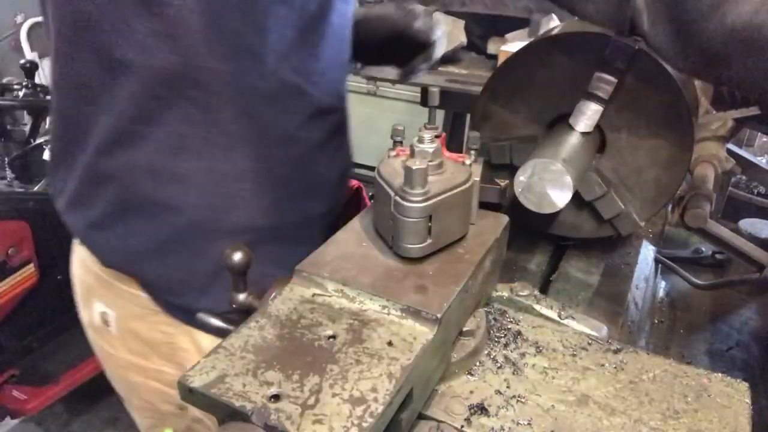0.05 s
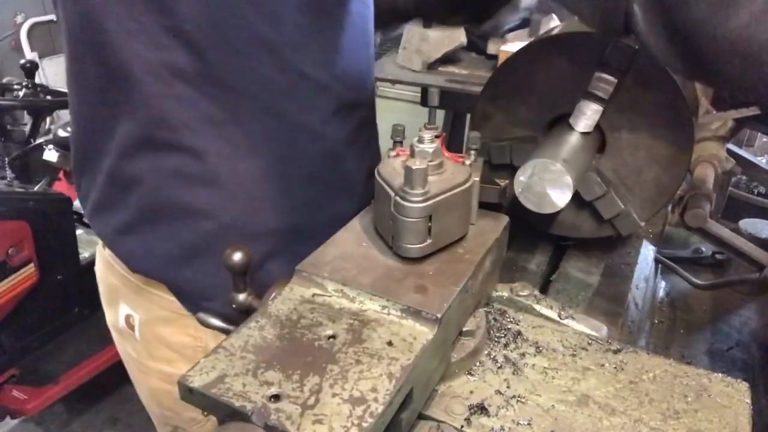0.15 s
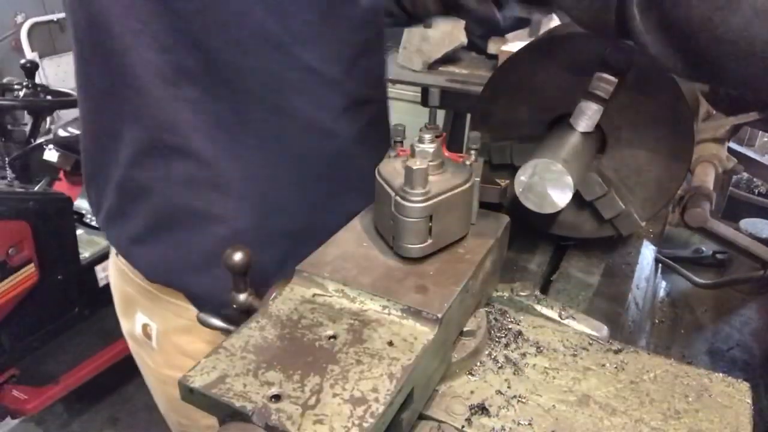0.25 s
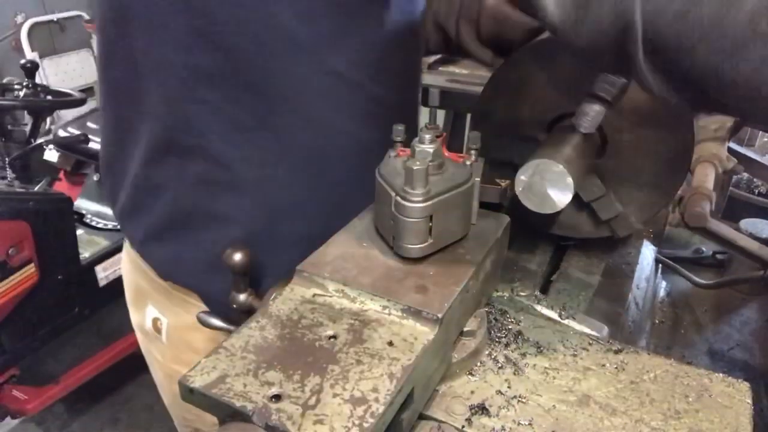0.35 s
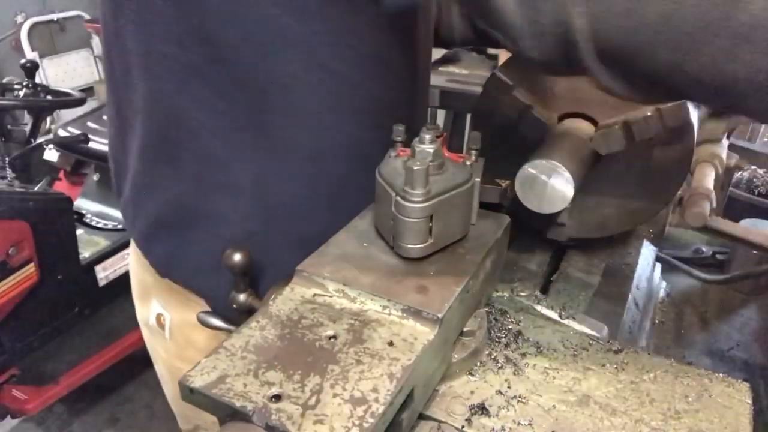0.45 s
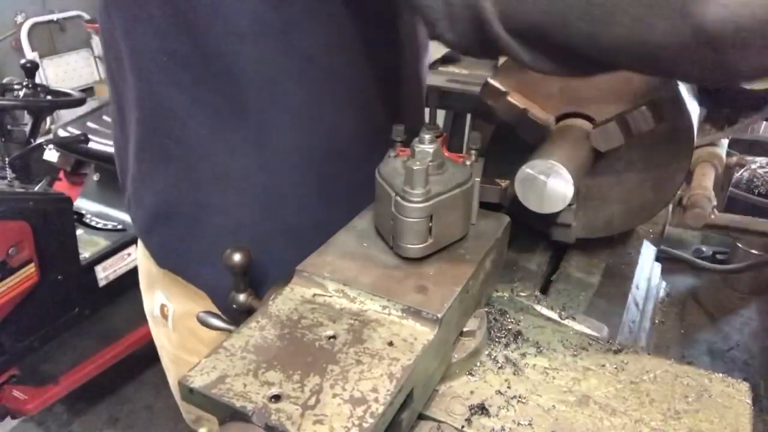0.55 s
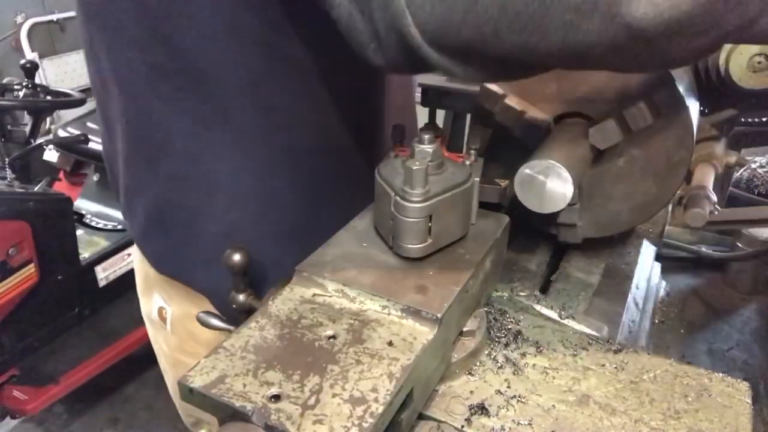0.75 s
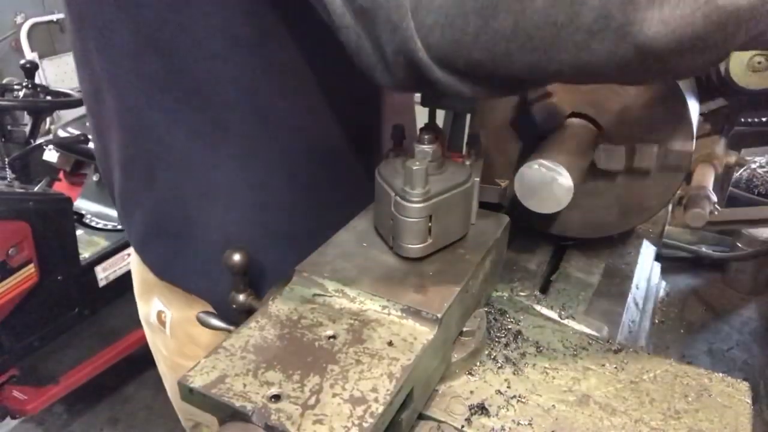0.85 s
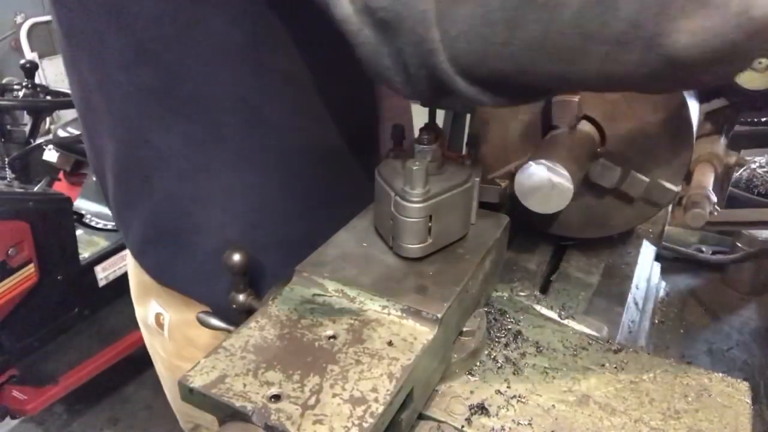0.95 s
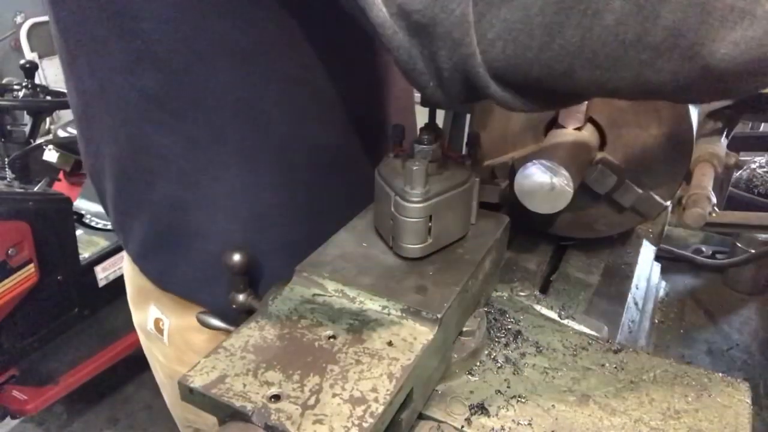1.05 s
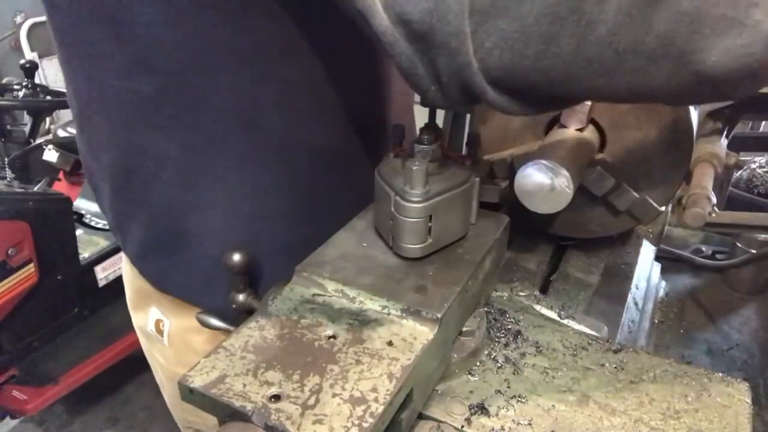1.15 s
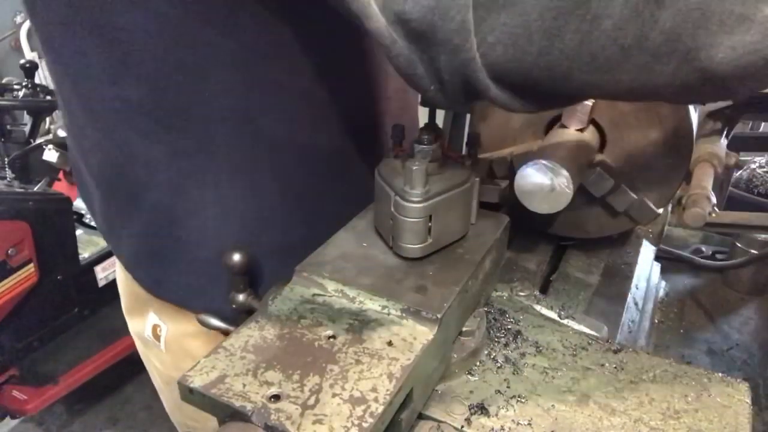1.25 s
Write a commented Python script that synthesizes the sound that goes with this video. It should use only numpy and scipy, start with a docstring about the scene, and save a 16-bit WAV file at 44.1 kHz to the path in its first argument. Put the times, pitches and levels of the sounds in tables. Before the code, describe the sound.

A steel lathe chuck is turned by hand, close up. A glove rustles faintly and the chuck scrapes and rumbles through the first 0.3 seconds. Two sharp, briefly ringing clacks land at about 0.4 and 0.47 seconds, the second with a low boom. A softer pair of knocks comes near 0.85 seconds, then small ticks and taps until 1.3 seconds, over low, steady workshop noise.

```python
"""A lathe chuck, turned by hand close to the microphone in a quiet workshop.
Its loose steel parts clack twice, each blow a crack of contact and a short, gritty ring; the second,
against the stop, makes the lathe's body boom. A softer pair of knocks and a few small ticks follow.
A glove rustles as it takes hold, and the chuck scrapes and rumbles in tiny slips as it is dragged round.
Behind it all are the workshop's short tail and low, steady room noise."""
import sys
import numpy as np
from scipy import signal
from scipy.fft import rfft, irfft
from scipy.io import wavfile
from scipy.ndimage import uniform_filter1d

SR = 44100
rng = np.random.default_rng(int(sys.argv[2]) if len(sys.argv) > 2 else 0)


def bounce(signal):
    """Save signal as a 16-bit WAV file at the path given by the first command-line argument."""
    frames = np.transpose(np.atleast_2d(signal))
    limited = np.clip(frames, -1, 1)
    pcm = np.round(limited * 32767).astype(np.int16)
    wavfile.write(sys.argv[1], SR, pcm)


N = 57330
T = np.arange(N) / SR


def amp(db):
    """Decibels to gain."""
    return 10 ** (np.asarray(db) / 20)


def unit(x):
    """Scales to rms 1."""
    return x / np.sqrt(np.mean(x ** 2) + 1e-20)


def burst(x):
    """Scales a short sound to the energy of 20 ms at rms 1."""
    return x * np.sqrt(.02 * SR / (np.sum(x ** 2) + 1e-20))


def fade(t60):
    """Exponential decay, 60 dB down after t60 seconds."""
    return np.exp(-np.log(1000) * T / t60)


def read(points, hz):
    """Reads (frequency, value) points on a log-frequency axis."""
    point_hz, value = np.transpose(points)
    return np.interp(np.log(hz + 1), np.log(point_hz + 1), value)


def colour(x, spectrum):
    """Filters x by a spectrum and scales it to rms 1."""
    gain = amp(read(spectrum, np.fft.rfftfreq(N, 1 / SR)))
    return unit(irfft(rfft(x) * gain, N))


def band(x, lo, hi, order=2):
    """Causal band-pass from lo to hi Hz."""
    sos = signal.butter(order, [lo, min(hi, SR / 2 - 100)], "band", fs=SR, output="sos")
    return signal.sosfilt(sos, x)


def add(mix, start, sound):
    """Mixes a sound in at start seconds, or at 0 if that is negative."""
    part = mix[max(round(start * SR), 0):]
    part += sound[:len(part)]


def ring(modes):
    """Dying sines of a struck object; neighbouring modes swing in opposite directions."""
    return sum((-1) ** k * amp(db) * fade(t60) * np.sin(2 * np.pi * hz * T)
               for k, (hz, db, t60) in enumerate(modes))


def hiss(spectrum, t60, even_hz=120):
    """A dying noise, evened out over spans of even_hz so that it keeps the given spectrum."""
    noise = rng.standard_normal(N) * fade(t60)
    bins = rfft(noise)
    local_power = uniform_filter1d(abs(bins) ** 2, round(even_hz * N / SR))
    even = irfft(bins / np.sqrt(local_power), N)
    return np.std(noise) * colour(even, spectrum)


def slips(per_s, spread_db=0.5):
    """A dense train of tiny slips of uneven size."""
    size = rng.standard_normal(N) * amp(spread_db * np.minimum(rng.exponential(1, N), 3))
    return size * (rng.random(N) < per_s / SR)


# edges of the six bands of a blow (frequency [Hz])
BAND_EDGES = [250, 450, 900, 1800, 3600, 7200, 15000]


def strike(modes, dense, damping_t60, levels, crack_db, crack_t60, grit_db, grit_t60, rise_s):
    """A bright crack, clear modes and a gritty ring; how the parts meet damps them and weights each band."""
    bright = [(hz, db + 5 * np.log2(hz)) for hz, db in dense]  # tilted up 5 dB per octave
    crack = amp(crack_db) * hiss(bright, crack_t60)
    grit = amp(grit_db) * hiss(dense, grit_t60)
    blow = (ring(modes) + crack + grit) * np.minimum(T / rise_s, 1) * fade(damping_t60)
    return sum((-1) ** k * amp(db) * burst(band(blow, lo, hi, order=3))
               for k, (db, lo, hi) in enumerate(zip(levels, BAND_EDGES, BAND_EDGES[1:])))


# clear modes of the stop (frequency [Hz], relative level [dB], t60 [s])
STOP_MODES = [(310, -5, .1), (405, -7, .1), (675, -3, .11), (984, -8, .08), (1084, 1, .085),
              (1184, -2, .055), (1222, 1, .075), (1420, -6, .08), (2060, 2, .1), (2369, -2, .1),
              (2510, -5, .08), (2966, -6, .1), (3270, -6, .07), (4034, -2, .12), (4165, -7, .1),
              (5787, -4, .03), (7962, -16, .08)]
# spectrum of its dense modes (frequency [Hz], relative density [dB])
STOP_DENSE = [(300, 3), (850, -8), (1250, -5), (1800, -4.5), (3000, -5.5), (4150, -5), (4450, -16.5),
              (5800, -11), (7000, -22), (15000, -43.5)]
# blows on the stop (time [s], contact damping t60 [s], level in each of the six bands [dB])
STOP_BLOWS = [(0.4647, 0.63, -40.5, -33.5, -27, -30, -38.5, -50.5),
              (0.4685, 0.074, -41.5, -37.5, -28, -40, -52.5, -54),
              (0.4745, 0.076, -35.5, -38, -30, -39, -48.5, -46.5)]


def stop_clack():
    """Close to the microphone, the chuck hits its stop with a heavy clack and chatters against it."""
    out = np.zeros(N)
    for start, damping_t60, *levels in STOP_BLOWS:
        clack = strike(STOP_MODES, STOP_DENSE, damping_t60, levels,
                       crack_db=12, crack_t60=0.035, grit_db=2, grit_t60=0.16, rise_s=0.00068)
        add(out, start, clack)
    return out


# clear modes of the chuck (frequency [Hz], relative level [dB], t60 [s])
CHUCK_MODES = [(385, -9, .03), (496, -4, .085), (688, -3, .06), (765, -7, .05), (820, -7, .05),
               (1102, -1, .055), (1371, 4, .06), (1540, -3, .05), (1606, 0, .06), (1899, -3, .055),
               (2045, -2, .05), (2260, 0, .055), (2422, -3, .065), (3350, 0, .016), (4786, -11, .055),
               (5060, -13, .055), (5640, -3, .02)]
# spectrum of its dense modes (frequency [Hz], relative density [dB])
CHUCK_DENSE = [(330, -3.5), (700, -11), (1000, -1.5), (1500, -2.5), (2450, -1), (2950, -6), (3450, -6.5),
               (3850, -18.5), (4400, -15.5), (5000, -7.5), (6200, -18.5), (7200, -20), (8500, -11),
               (15000, -21.5)]
# blows in the chuck (time [s], contact damping t60 [s], level in each of the six bands [dB])
CHUCK_BLOWS = [(0.0, 0.71, -50, -73, -74, -88, -66, -74), (0.131, 0.25, -48.5, -60, -53, -61, -81, -71.5),
               (0.196, .15, -47, -48.5, -65, -71, -74, -74), (0.4055, 0.72, -49, -35, -31, -31, -38, -53.5),
               (0.8298, 0.35, -76, -44, -42, -56, -62.5, -77),
               (0.8626, 0.4, -40.5, -41, -57, -57, -86, -76), (1.001, 0.22, -82, -60, -63, -64.5, -86, -92),
               (1.087, 0.53, -77, -58.5, -61, -78, -87, -99),
               (1.2843, 0.91, -52.5, -52, -89, -75, -75, -85)]


def chuck_knocks():
    """Loose steel parts knock together and set the chuck ringing."""
    out = np.zeros(N)
    for start, damping_t60, *levels in CHUCK_BLOWS:
        knock = strike(CHUCK_MODES, CHUCK_DENSE, damping_t60, levels,
                       crack_db=9, crack_t60=0.033, grit_db=-1, grit_t60=0.12, rise_s=0.0013)
        add(out, start, knock)
    return out


# modes of the lathe's body (frequency [Hz], relative level [dB], t60 [s])
BODY_MODES = [(98.8, 3.5, 0.32), (129.4, 7.5, .27), (172, 0.5, 0.24), (250, -40.5, 0.38), (311, -17, 0.79)]
# jolts that reach the body (time [s], level [dB])
BODY_JOLTS = [(-0.01, -49), (0.275, -49), (0.467, -33.5), (0.511, -38), (0.864, -53), (0.924, -56.5)]


def body_boom(rise_s=0.015):
    """The lathe's body swells and hums after each jolt."""
    out = np.zeros(N)
    hum = ring(BODY_MODES) * np.minimum(T / rise_s, 1)
    for start, db in BODY_JOLTS:
        add(out, start, amp(db) * hum)
    return out


# drag of the turning chuck (time [s], rumble level [dB], scrape level [dB])
DRAG_LEVELS = [(0.0, -42.5, -47), (0.06, -58.5, -73.5), (0.114, -59, -66), (0.131, -40, -53),
               (0.178, -41, -51.5), (0.202, -36.5, -43), (0.248, -38, -49), (0.288, -47, -57),
               (0.352, -64.5, -72.5), (0.402, -56, -55.5), (0.839, -78, -70.5), (0.898, -46, -66),
               (0.96, -64, -76), (1.04, -64.5, -71)]
# its hollow resonances (frequency [Hz], width [Hz], relative level [dB])
HOLLOW_RESONANCES = [(111, 27, -11), (147, 90, -5), (252.8, 39, 2), (318.3, 21.3, 0), (421, 120, -11)]
# spectrum of its scrape (frequency [Hz], relative density [dB])
SCRAPE_SPECTRUM = [(80, -35), (300, -1.5), (650, 10), (900, 1), (1300, 1.5), (2500, -6), (5000, -12),
                   (9000, -24.5), (16000, -32)]


def chuck_drag(slips_per_s=5000):
    """Slips scrape and stir hollow resonances as the chuck is pulled round."""
    times, rumble_db, scrape_db = np.transpose(DRAG_LEVELS)
    turning = T < times[-1]
    rumble_gain = amp(np.interp(T, times, rumble_db)) * turning
    scrape_gain = amp(np.interp(T, times, scrape_db)) * turning
    hollow = np.zeros(N)
    for hz, width, db in HOLLOW_RESONANCES:
        resonance = band(slips(slips_per_s), hz - width / 2, hz + width / 2)
        hollow += amp(db) * unit(rumble_gain * resonance)
    rumble = np.sqrt(np.mean(rumble_gain ** 2)) * unit(hollow)
    return rumble + scrape_gain * colour(slips(slips_per_s), SCRAPE_SPECTRUM)


# light ticks of steel (time [s], level [dB], centre frequency [Hz])
STEEL_TICKS = [(0.103, -65.5, 5300), (0.123, -66, 5200), (0.191, -65.5, 6750), (0.522, -64.5, 7900),
               (0.863, -68, 11600), (0.57, -63, 3330), (0.948, -65.5, 7500), (0.951, -71, 10000),
               (0.999, -60.5, 3520), (1.139, -72.5, 6500)]


def steel_ticks(t60=0.038, edge_ratio=1.26):
    """Light contacts, each a quickly dying band of treble noise."""
    out = np.zeros(N)
    for start, db, hz in STEEL_TICKS:
        tick = band(rng.standard_normal(N) * fade(t60), hz / edge_ratio, hz * edge_ratio)
        add(out, start, amp(db) * burst(tick))
    return out


# pings and squeaks (time [s], level [dB], frequency [Hz], width [Hz], rise [s], t60 [s])
STEEL_PINGS = [(0.863, -63, 12060, 400, .001, .07), (0.9467, -63.5, 4700, 500, 0.0014, .025),
               (0.974, -67, 5580, 69, 0.018, .18)]


def steel_pings():
    """Steel on steel pings and squeaks thinly, in narrow bands of noise."""
    out = np.zeros(N)
    for start, db, hz, width, rise_s, t60 in STEEL_PINGS:
        narrow = band(rng.standard_normal(N), hz - width / 2, hz + width / 2)
        ping = narrow * np.minimum(T / rise_s, 1) * fade(t60)
        add(out, start, amp(db) * burst(ping))
    return out


# rustles of the glove (peak time [s], level [dB], half length [s])
GLOVE_RUSTLES = [(0.004, -64, 0.065), (0.172, -58, 0.014)]


def glove(snags_per_s=600, low_hz=3270, high_hz=8300):
    """Near the microphone, the glove rustles in tiny snags as it takes hold."""
    swell = sum(amp(db) * np.exp(-((T - peak) / half) ** 2) for peak, db, half in GLOVE_RUSTLES)
    return swell * unit(band(slips(snags_per_s), low_hz, high_hz))


# decay of the workshop (frequency [Hz], t60 [s])
WORKSHOP_DECAY = [(100, 0.42), (400, 0.14), (1500, 0.18), (5000, 0.2), (15000, 0.15)]


def workshop_tail(x, delay_s=0.018):
    """The workshop's reflections reach the microphone as a short tail, longest in the bass."""
    reflections = rng.standard_normal(N) * (rng.random(N) < .1)
    hz, t, bins = signal.stft(reflections, SR, nperseg=256)
    decay = np.exp(-np.log(1000) * t / read(WORKSHOP_DECAY, hz)[:, None])
    tail = signal.istft(bins * decay, SR, nperseg=256)[1][:N] * (T > delay_s)
    return signal.fftconvolve(x, tail / np.linalg.norm(tail))[:N]


# spectrum of the quiet workshop (frequency [Hz], relative density [dB])
ROOM_TONE_SPECTRUM = [(25, -52), (60, 4.5), (95, 5.5), (135, 2.5), (165, 1.5), (200, 7.5), (260, -3),
                      (400, -7), (1000, -10), (1500, -14), (5000, -21.5), (8000, -22.5), (10000, -26),
                      (16000, -26)]


def room_tone():
    """Low, steady noise of the workshop behind the lathe."""
    return colour(rng.standard_normal(N), ROOM_TONE_SPECTRUM)


def scene():
    """The lathe up close, with the workshop well below it in level; mono."""
    steel = chuck_knocks() + stop_clack() + steel_ticks() + steel_pings()
    workshop = amp(-59) * room_tone() + amp(-16) * workshop_tail(steel)
    return (steel + body_boom() + chuck_drag() + glove() + workshop)[None]


def record(dry):
    """The microphone rolls off the deep bass and cuts the highest treble."""
    low_hz, high_hz = 80.5, 15900
    high_pass = signal.butter(4, low_hz, "high", fs=SR, output="sos")
    low_pass = signal.firwin(511, high_hz, window=("kaiser", 9), fs=SR)
    return signal.oaconvolve(signal.sosfilt(high_pass, dry), low_pass[None], "same")


dry = scene()
out = record(dry)
bounce(out)
```